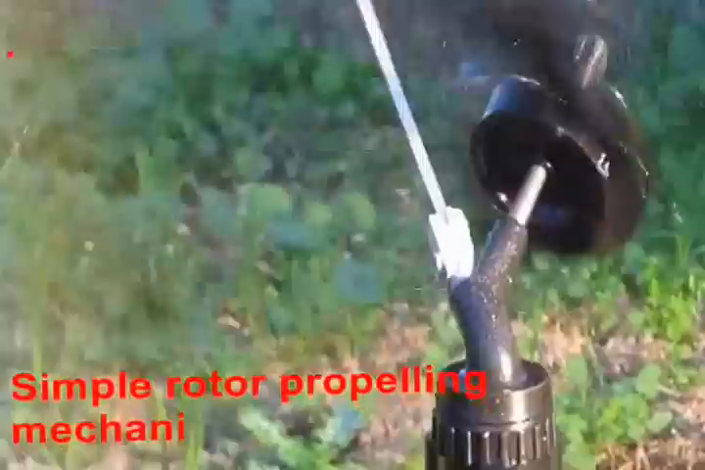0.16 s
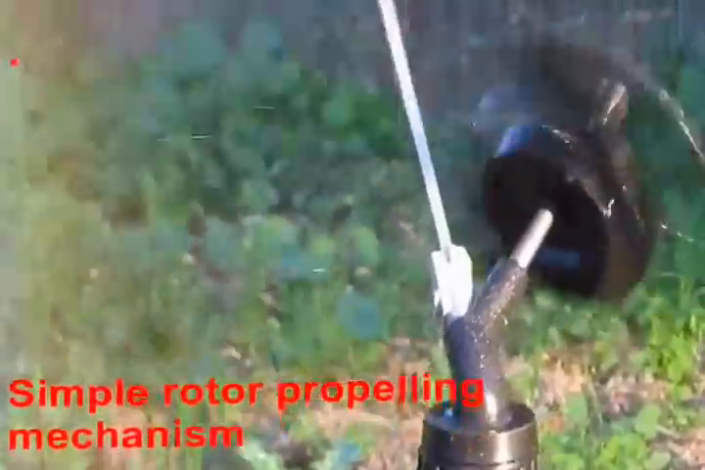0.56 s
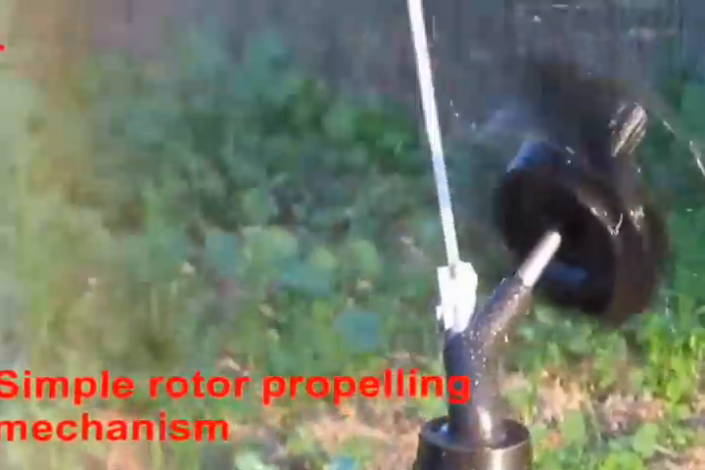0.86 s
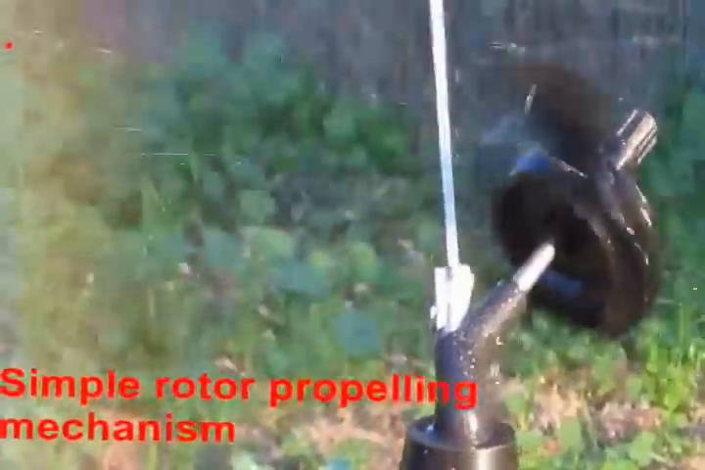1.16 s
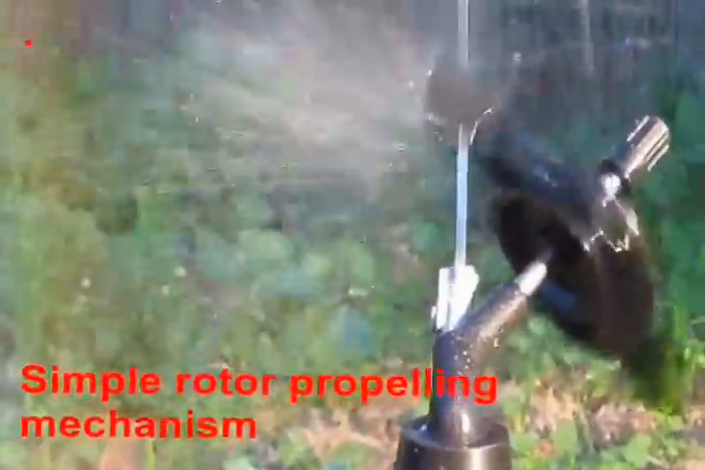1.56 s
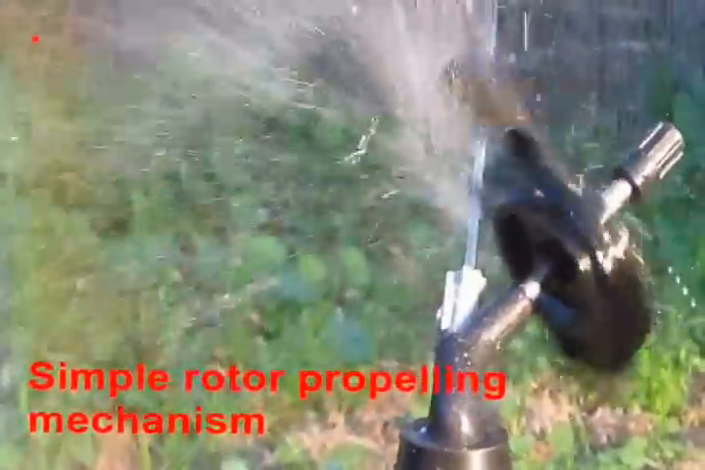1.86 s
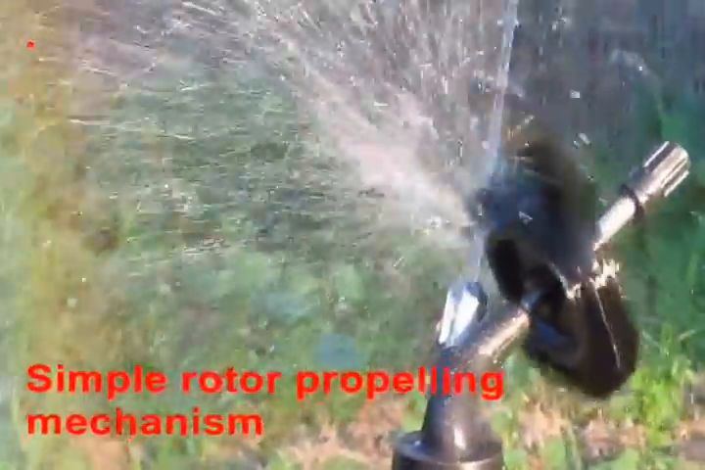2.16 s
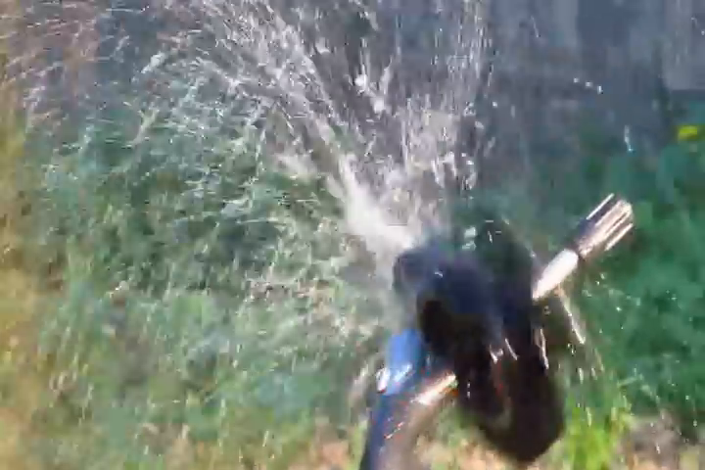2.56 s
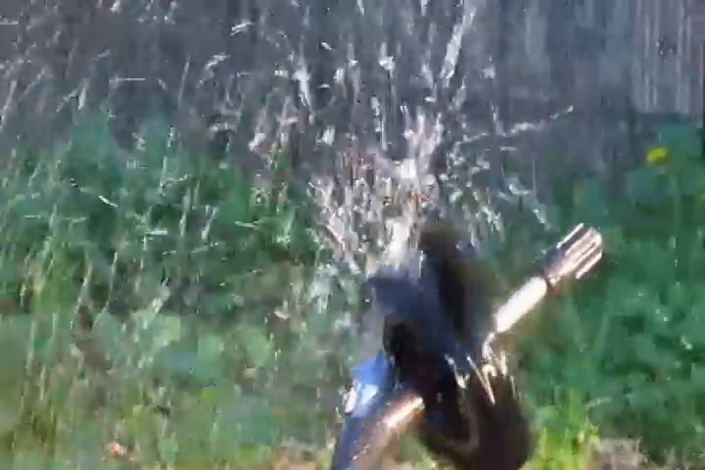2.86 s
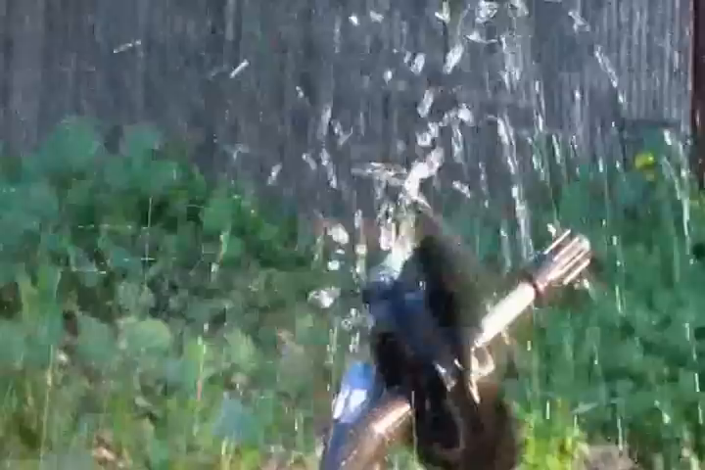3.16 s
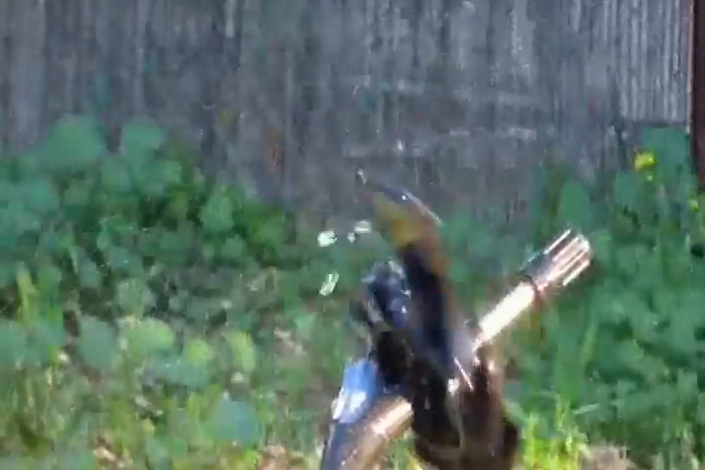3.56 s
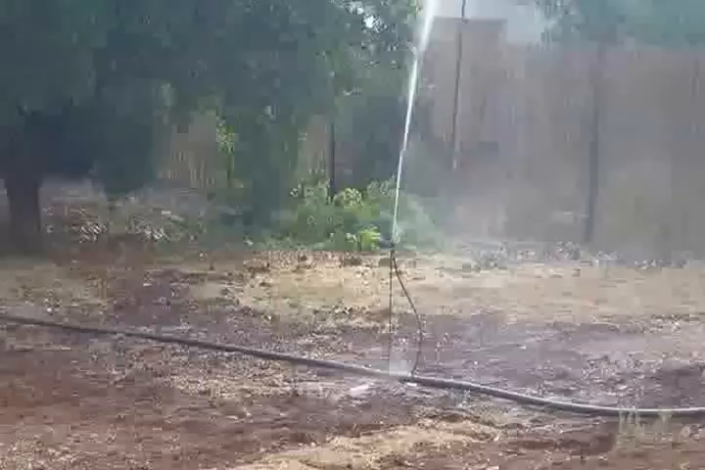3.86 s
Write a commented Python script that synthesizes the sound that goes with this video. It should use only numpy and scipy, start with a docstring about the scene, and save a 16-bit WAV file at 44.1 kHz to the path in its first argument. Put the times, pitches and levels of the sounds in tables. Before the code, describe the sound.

A rotor sprinkler sprays in rapid, sharp, regular pulses over a steady water hiss outdoors.

```python
"""In a garden, a rotor sprinkler runs close by. Its spinning wheel cuts the water jet about sixteen times a second:
each cut is a click of noise and a short burst of spray with spattering drops. For the first part, sharp spits of
water ring like gliding bubbles. The nozzle hisses (shaped noise and stray drops) over a wavering low hum, and
delayed copies throw the water sounds back. The sound fades away and ends with one short puff of noise."""
import sys
import numpy as np
from scipy import signal
from scipy.fft import rfft, irfft, next_fast_len
from scipy.io import wavfile

SR = 44100
rng = np.random.default_rng(int(sys.argv[2]) if len(sys.argv) > 2 else 0)


def persist_wave(psi):
    """Save psi, clipped to +-1, as 16-bit WAV."""
    counts = np.round(np.clip(psi, -1, 1) * 32767).astype(np.int16)
    wavfile.write(sys.argv[1], SR, np.atleast_2d(counts).T)


N = 176400  # samples, 4 s
EDGE_HZ = 15800  # top of the audible band
TICK_S = 0.00029  # decay of a wheel tick or a stray drop

# sharp spits of water: time_s, ring_db, ring_pitch_hz, crack_db
SPIT_EVENTS = [(0.024, -22, 6390, -18.5), (0.093, -17.5, 6080, -15.5), (0.1623, -12, 5870, -17.5),
               (.231, -15.5, 5760, -15.5), (0.2994, -26, 6800, -16.5), (0.3686, -16, 5050, -16),
               (0.4375, -20, 6570, -15.5), (0.5055, -13, 5950, -16.5), (.5743, -10.5, 5690, -16),
               (0.6442, -17.5, 5440, -17.5), (0.7143, -15, 4850, -16.5), (0.7847, -17.5, 5700, -18),
               (0.8532, -13, 5780, -17), (0.9219, -18.5, 6700, -15.5), (0.9909, -15.5, 6600, -15.5),
               (1.0593, -17, 5800, -19.5), (1.126, -30, 7860, -20), (1.1932, -19, 6440, -22),
               (1.258, -24, 6720, -29.5), (1.3865, -15.5, 6700, -20.5)]
# colour of bright cracks and fizz: frequency_hz, density_db (per Hz, relative)
CRACK_COLOUR = [(100, -36), (2000, -20), (3500, -11), (5200, -1), (7500, -1.5), (11000, -0.5), (16000, -10)]


def amp(db):
    """Decibels to gain."""
    return 10 ** (np.asarray(db) / 20)


def unit(x):
    """Scales to an rms of 1."""
    return x / np.sqrt(np.mean(x ** 2) + 1e-20)


def clock():
    """Time of every sample in seconds."""
    return np.arange(N) / SR


def level(points):
    """Gain that follows a table of (s, dB)."""
    return amp(np.interp(clock(), *np.transpose(points)))


def colour(x, points):
    """Filters by a table of (Hz, dB), keeping the power of white noise below the band edge."""
    hz, db = np.transpose(points)
    size = next_fast_len(N + SR // 2)
    f = np.fft.rfftfreq(size, 1 / SR)
    gain = amp(np.interp(np.log(f + 1), np.log(hz), db))
    gain_rms = np.sqrt(np.mean(gain[f < EDGE_HZ] ** 2))
    return irfft(rfft(x, size) * gain / gain_rms, size)[:N]


def wander(width_hz):
    """Complex noise of power 1 in a band around 0 Hz."""
    white = rng.standard_normal(N) + 1j * rng.standard_normal(N)
    rolloff = 1 + (2 * np.fft.fftfreq(N, 1 / SR) / width_hz) ** 4
    z = np.fft.ifft(np.fft.fft(white) / rolloff)
    return z / np.sqrt(np.mean(abs(z) ** 2))


def around(s, size=1800):
    """The samples near a moment, and their times from it."""
    at = np.arange(max(round(s * SR) - size, 0), min(round(s * SR) + size, N))
    return at, at / SR - s


def spray_drops(per_s, spread_db):
    """Sparse clicks of random sign, a few much larger than the rest."""
    sizes = amp(spread_db * np.minimum(rng.exponential(1, N), 4))
    signs = np.sign(rng.standard_normal(N))
    lands = rng.random(N) < per_s / SR
    return unit(sizes * signs * lands)


def nozzle():
    """The hiss of the jet as shaped noise, with stray drops as decaying ticks of noise through it."""
    # level of the hiss: time_s, level_db
    hiss_level = [(0, -34), (.08, -35), (.125, -42), (.7, -43), (1.3, -42), (1.95, -39), (2.45, -40),
                  (3.1, -44), (3.43, -48.5), (3.62, -54.5), (3.74, -60), (3.81, -68.5), (3.845, -86),
                  (3.9, -110)]
    # colours of the hiss and the drops: frequency_hz, density_db (per Hz, relative)
    hiss_colour = [(20, -5), (45, 3.5), (110, 8), (200, 7.5), (350, -0.5), (520, 0.5), (1000, 1),
                   (2400, 0.5), (5000, -2.5), (10000, -3.5), (13000, -7), (16000, -9.5)]
    drop_colour = [(200, -13.5), (2000, -9), (6000, 0.5), (16000, -7)]
    drops_db = -14  # under the hiss

    clicks = spray_drops(per_s=500, spread_db=3.2)
    decays = signal.lfilter([1], [1, -np.exp(-1 / (TICK_S * SR))], clicks)
    drops = unit(decays * rng.standard_normal(N))
    hiss = colour(rng.standard_normal(N), hiss_colour)
    return level(hiss_level) * (hiss + amp(drops_db) * colour(drops, drop_colour))


def hum():
    """A low tone, roughened by narrow-band noise on its carrier, that swells and sinks."""
    # level of the hum: time_s, level_db
    hum_level = [(0, -57), (1.05, -62), (1.45, -51.5), (1.92, -47.5), (2.2, -50), (2.45, -55.5),
                 (2.54, -50), (2.76, -57), (2.95, -51), (3.17, -61.5), (3.35, -55), (3.74, -71.5),
                 (3.88, -125)]
    pitch_hz, width_hz, roughness = 68.1, 35, 0.2

    carrier = np.exp(2j * np.pi * pitch_hz * clock())
    tone = ((1 + roughness * wander(width_hz)) * carrier).real
    return level(hum_level) * unit(tone)


def cuts():
    """The wheel meets the jet with a tick, shatters it into mist and spatter, and leaves it with a last flick."""
    # the wheel cuts the jet: time_s, spray_db, tick_db (before the tick lift)
    wheel_cuts = [(.0085,-23,-16.5), (0.0244,-35.5,-27), (0.0668,-27.5,-5.5), (0.09,-31,-28),
                  (0.1587,-33,-14), (0.2266,-33,-31), (0.2963,-36,-19), (0.3656,-33,-17), (0.434,-32.5,-16),
                  (0.506,-32.5,-25), (.572,-32.5,-16.5), (0.6429,-32,-22), (0.711,-32,-31),
                  (0.7808,-31,-30), (0.8516,-32,-20), (0.9199,-31.5,-18), (0.988,-29.5,-20),
                  (1.0569,-30.5,-10), (1.123,-29.5,-27), (1.19,-29,-13), (1.2558,-28,-12.5),
                  (1.3201,-28,-18), (1.386,-28,-18), (1.448,-27.5,-15), (1.5108,-25,-30), (1.5747,-27,-22),
                  (1.6377,-25.5,-23), (1.7017,-26.5,-21), (1.764,-25,-16), (1.8276,-25.5,-12.5),
                  (1.89,-25,-29), (1.953,-24.5,-39), (2.015,-24,-30), (2.0792,-23.5,-12), (2.143,-25,-11),
                  (2.2048,-25,-19), (2.267,-24,-34), (2.328,-24,-36), (2.3886,-24.5,-39), (2.449,-26,-39),
                  (2.51,-24.5,-32), (2.5691,-25.5,-30), (2.6303,-25.5,-20), (2.689,-27,-12.5),
                  (2.7484,-27.5,-17.5), (2.806,-29,-38), (2.865,-28,-34), (2.924,-28.5,-20),
                  (2.9828,-28,-39), (3.0412,-30.5,-41.5), (3.1018,-29,-43), (3.16,-30,-25.5),
                  (3.219,-30.5,-27.5), (3.2761,-31.5,-38.5), (3.337,-31,-31.5), (3.394,-33.5,-28),
                  (3.453,-34,-27), (3.511,-36.5,-24), (3.5703,-38.5,-22.5), (3.6287,-40,-41),
                  (3.6876,-41.5,-46.5), (3.747,-46,-52.5), (3.8043,-56,-38)]
    # colours of mist, tick and spatter: frequency_hz, density_db (per Hz, relative)
    spray_colour = [(40, -10.5), (130, 2), (190, -1.5), (260, 1.5), (370, -3.5), (520, -4), (980, 0),
                    (1450, -2.5), (2500, 2), (3300, -1), (4100, 0.5), (5300, 0), (7800, -1), (10000, 1),
                    (12600, -3), (15500, -10)]
    tick_colour = [(100, -10.5), (2000, -8.5), (6000, -6.5), (11000, 5), (16000, -3.5)]
    spatter_colour = [(300, -14.5), (2000, -20.5), (6000, -5.5), (10000, 7), (16000, -3)]
    rise_s, fall_s = 0.00096, 0.0029
    first_hold_s, hold_shrink_s_per_s = 0.014, 0.0013  # bursts shorten as time goes on
    flick_db, flick_width_s = -10, 0.00026  # under the burst
    tick_lag_s, tick_lift_db = 0.00054, 3
    spatter_db = -7  # under the mist

    spray, tick = np.zeros((2, N))
    for (s, spray_db, tick_db), flick_size in zip(wheel_cuts, rng.rayleigh(1, len(wheel_cuts))):
        at, t = around(s)
        hold = first_hold_s - hold_shrink_s_per_s * s
        body = np.clip(t / rise_s, 0, 1) * np.exp(-np.maximum(t - hold, 0) / fall_s)
        flick = flick_size * amp(flick_db) * np.exp(-abs(t - hold) / flick_width_s)
        spray[at] += amp(spray_db) * (body + flick)
        decay = (t > tick_lag_s) * np.exp(-abs(t - tick_lag_s) / TICK_S)
        tick[at] += amp(tick_db + tick_lift_db) * decay

    mist = colour(spray * rng.standard_normal(N), spray_colour)
    drops = spray * spray_drops(per_s=900, spread_db=3.5)
    spatter = amp(spatter_db) * colour(drops, spatter_colour)
    return mist + spatter + colour(tick * rng.standard_normal(N), tick_colour)


def splashes():
    """Clusters of full slaps and grainy fizz, and a faint graze of the jet just ahead of each spit."""
    # heavier splashes: time_s, length_s, slap_db, fizz_db
    splash_events = [(0.0146, .003, -37, -31), (0.0185, .002, -20, -29.5), (.063, .0007, -37.5, -26),
                     (0.074, .003, -36.5, -21), (0.078, 0.0033, -36, -31)]
    # colour of the slaps: frequency_hz, density_db (per Hz, relative)
    slap_colour = [(50, 3), (200, -13.5), (520, -10), (830, 2.5), (1300, -5), (2300, 1.5), (3500, -2.5),
                   (6000, -6), (16000, -20)]
    graze_lead_s, graze_width_s, graze_db = 0.014, 0.0044, -24  # level relative to the crack
    grain_db, grain_hz = 3, 2000

    slap, fizz, graze = np.zeros((3, N))
    for s, length, slap_db, fizz_db in splash_events:
        at, t = around(s)
        swell = np.exp(-(t / length) ** 2)
        slap[at] += amp(slap_db) * swell
        fizz[at] += amp(fizz_db) * swell
    for s, _, _, crack_db in SPIT_EVENTS:
        at, t = around(s - graze_lead_s)
        graze[at] += amp(crack_db + graze_db) * np.exp(-(t / graze_width_s) ** 2)

    grain = unit(amp(grain_db * unit(wander(grain_hz).real)))
    slaps = colour(slap * rng.standard_normal(N), slap_colour)
    return slaps + colour((fizz + graze) * grain * rng.standard_normal(N), CRACK_COLOUR)


def spits():
    """A slug of water bursts: a bright crack around a ring of a few cycles that bends upward like a bubble's."""
    ring_width_s, glide_hz_per_s = 0.0003, 591000
    crack_rise_s, crack_fall_s = 0.00092, 0.0013
    phase_roughness = 0.61  # scale of the phase wobble; about 0.43 radians rms

    ring, crack = np.zeros((2, N))
    waver = np.exp(1j * phase_roughness * np.sqrt(1) * wander(width_hz=2200).real * 1)
    for s, ring_db, hz, crack_db in SPIT_EVENTS:
        at, t = around(s)
        pitch = np.clip(hz + glide_hz_per_s * t, hz / 2, 2 * hz)
        turns = np.cumsum(pitch) / SR
        tone = np.sqrt(2) * (waver[at] * np.exp(2j * np.pi * turns)).real
        # both envelopes are exponentials with a rounded peak of 1
        ring[at] += amp(ring_db) * np.exp(1 - np.hypot(t / ring_width_s, 1)) * tone
        side_s = np.where(t < 0, crack_rise_s, crack_fall_s)
        crack[at] += amp(crack_db) * np.exp(1 - np.hypot(t / side_s, 1))
    return ring + colour(crack * rng.standard_normal(N), CRACK_COLOUR)


def puff():
    """One short puff of noise with a faint, quick tail."""
    # colour of the puff: frequency_hz, density_db (per Hz, relative)
    puff_colour = [(50, -2.5), (2500, 0), (6000, -5.5), (16000, -8)]
    start_s, length_s, puff_db = 3.8483, 0.0059, -36
    tail_db, tail_s = -10, 0.003  # level relative to the puff

    t = clock() - start_s
    tail = amp(tail_db) * np.exp(-abs(t - length_s) / tail_s)
    shape = (t > 0) * np.where(t < length_s, 1, tail)
    return amp(puff_db) * colour(shape * rng.standard_normal(N), puff_colour)


def garden(x):
    """Dulled echoes from the ground and nearby things, and a faint short scatter from the plants."""
    # fainter echoes from things close to the nozzle: delay_s, level_db
    near_echoes = [(.00162, -23), (.00197, -26), (.00425, -26)]
    ground_s, ground_db = 0.00318, -11.5
    dulling_hz = 7000  # echoes are down 6 dB here
    scatter_db, scatter_t60_s = -21, 0.16

    f = np.fft.rfftfreq(2 * N, 1 / SR)
    delays = [(ground_s, ground_db)] + list(near_echoes)
    paths = sum(amp(db) * np.exp(-2j * np.pi * f * s) for s, db in delays)
    echoes = irfft(rfft(x, 2 * N) * paths / (1 + (f / dulling_hz) ** 2))[:N]
    t = clock()[:SR // 4]
    scatter = rng.standard_normal(len(t)) * amp(-60 * t / scatter_t60_s)
    scatter /= np.linalg.norm(scatter)
    return x + echoes + amp(scatter_db) * signal.fftconvolve(x, scatter)[:N]


def scene():
    """The water sounds echo in the garden; the hum and the puff stay dry."""
    water = nozzle() + cuts() + splashes() + spits()
    return (garden(water) + hum() + puff())[None]


def record(dry):
    """Limits the band with a steep low-pass at its top edge."""
    lowpass = signal.firwin(301, EDGE_HZ, window=("kaiser", 8), fs=SR)
    return signal.oaconvolve(dry, lowpass[None], "same")


dry = scene()
out = record(dry)
persist_wave(out)
```